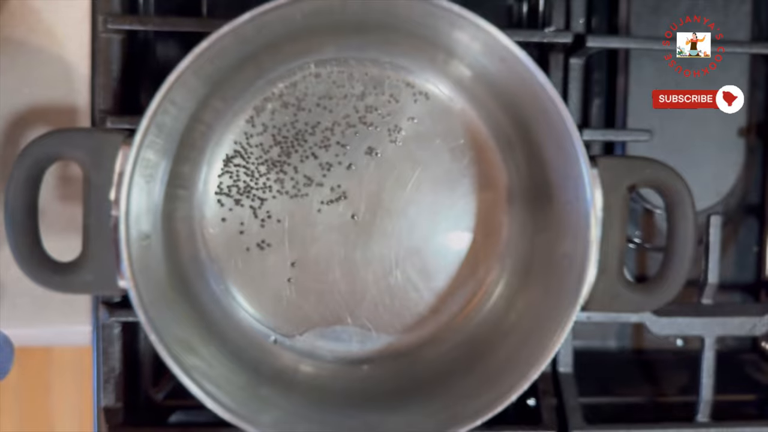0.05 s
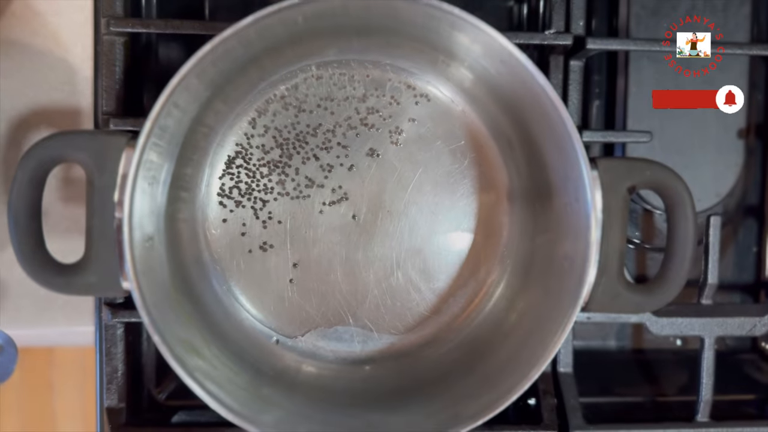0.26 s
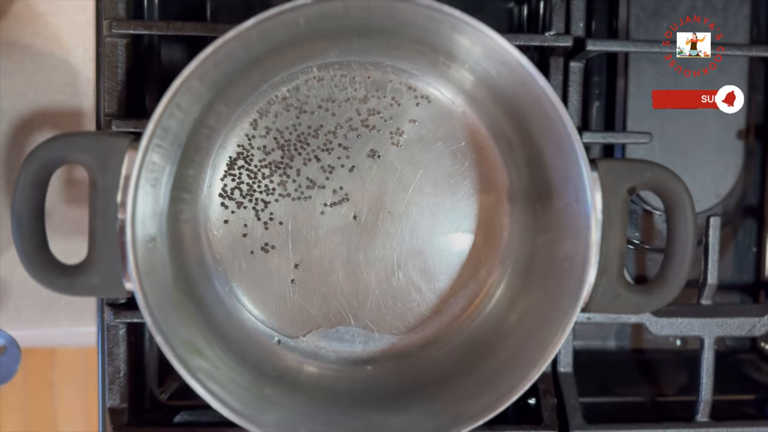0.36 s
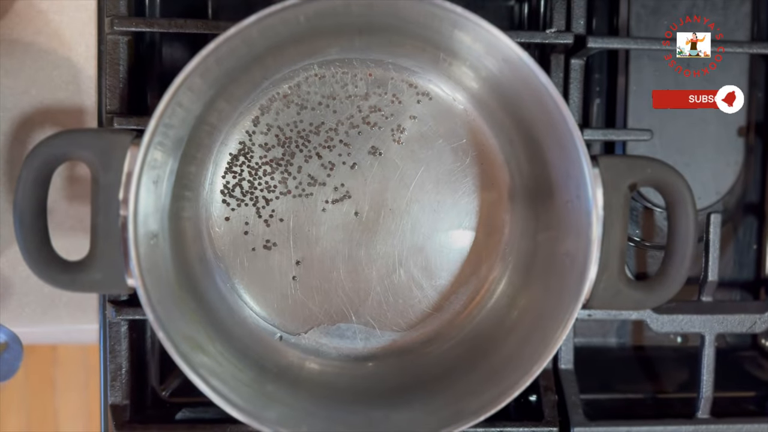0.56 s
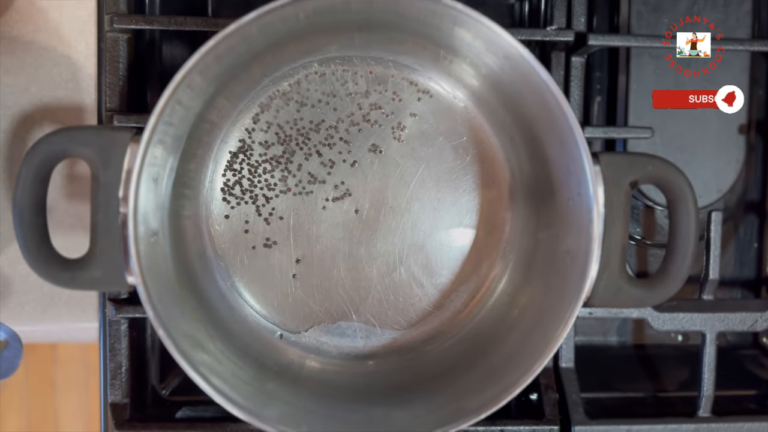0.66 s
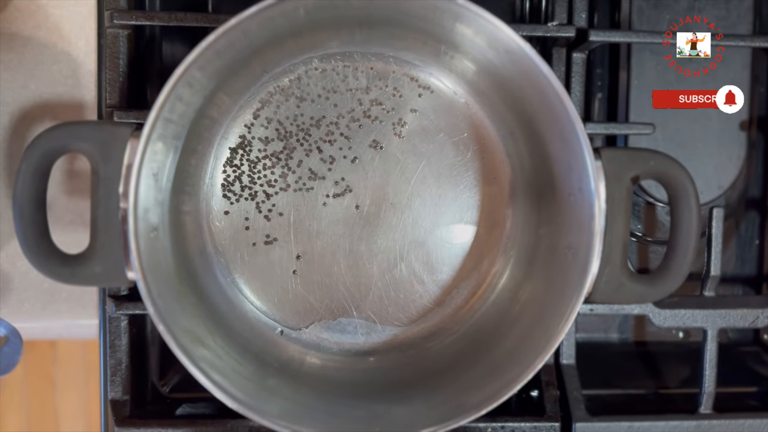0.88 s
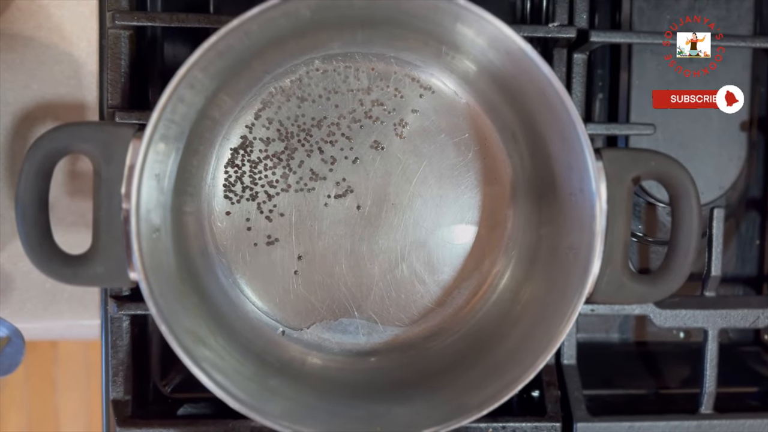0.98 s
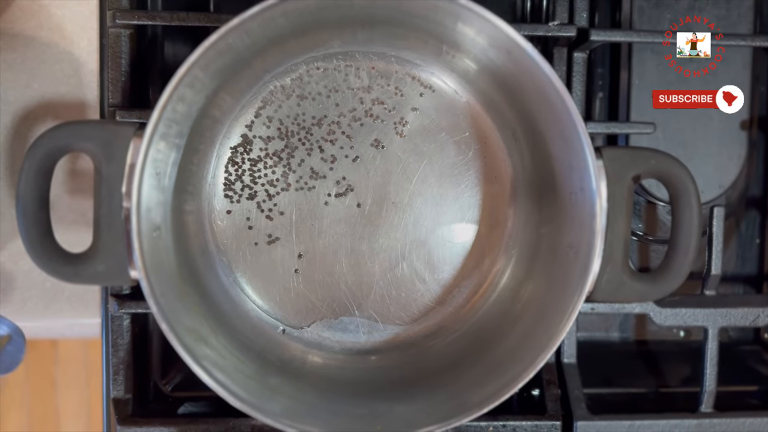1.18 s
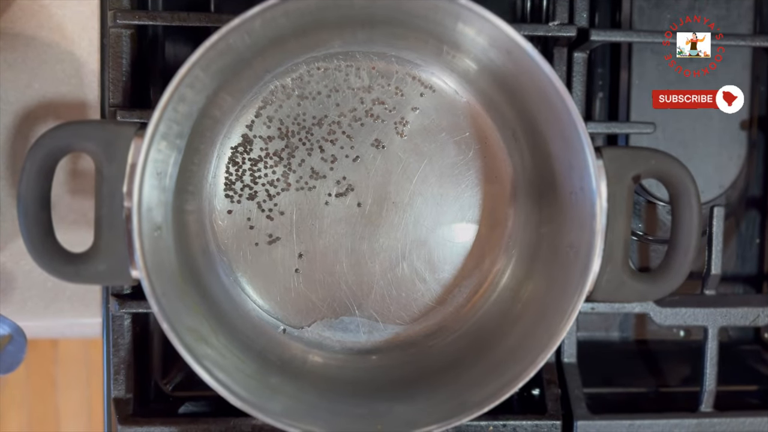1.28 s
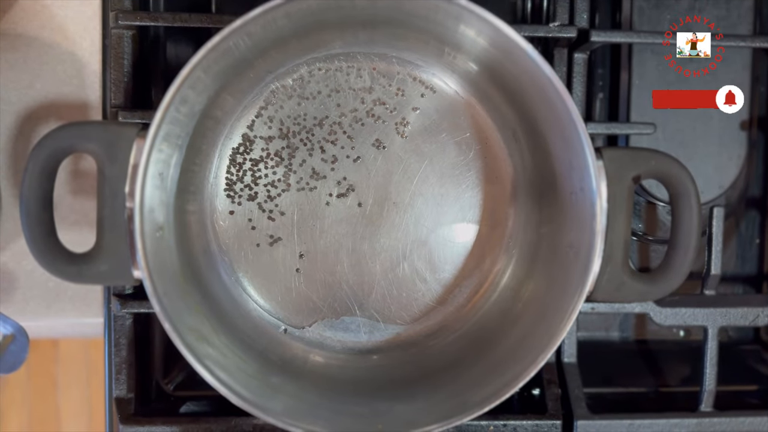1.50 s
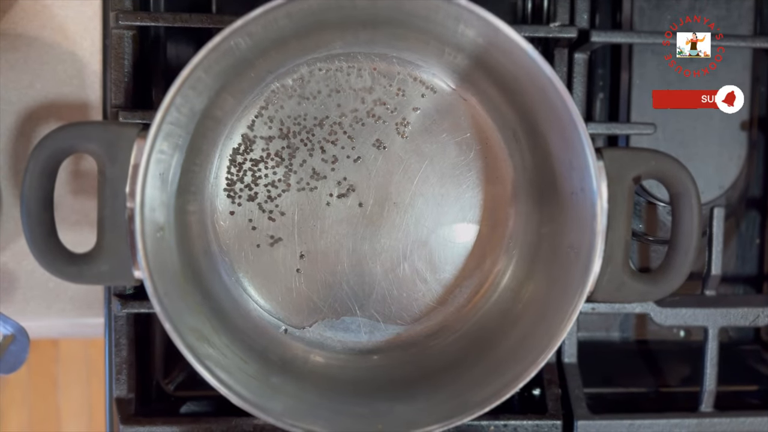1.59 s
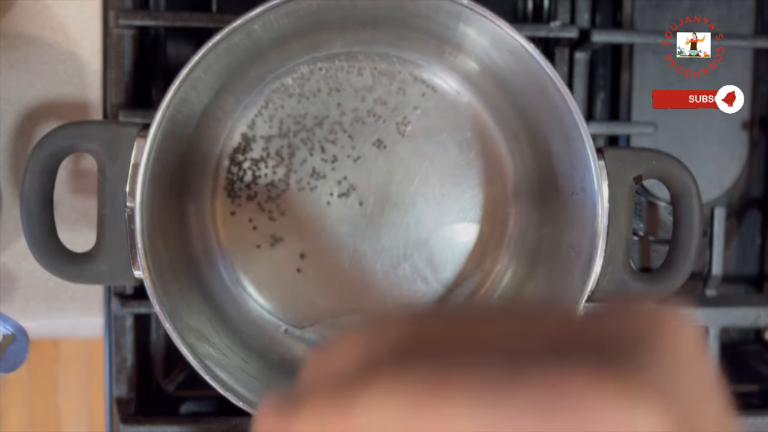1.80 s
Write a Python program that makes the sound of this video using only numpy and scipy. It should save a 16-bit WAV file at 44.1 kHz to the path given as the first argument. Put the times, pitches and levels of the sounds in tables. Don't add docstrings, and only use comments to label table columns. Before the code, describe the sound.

Seeds sizzle softly in hot oil while a small hollow jar knocks and scrapes on a counter

```python
import sys
import numpy as np
from scipy import signal
from scipy.fft import rfft, irfft, next_fast_len
from scipy.io import wavfile

SR = 44100
rng = np.random.default_rng(int(sys.argv[2]) if len(sys.argv) > 2 else 0)


def transcribe(u):
    v = np.clip(np.atleast_2d(u).T, -1, 1)
    q = np.round(v * 32767).astype(np.int16)
    wavfile.write(sys.argv[1], SR, q)


def level_to_linear(level):
    exponent = np.asarray(level, float) / 20
    return 10 ** exponent


N = 81585


def rms_one(x):
    return x / np.sqrt(np.mean(x ** 2) + 1e-20)


def in_time(rows):
    return np.interp(np.arange(N) / SR, *np.transpose(rows))


def at_hz(points, hz):
    points = np.array(points)
    return np.interp(np.log(hz + 1), np.log(points[:, 0]), points[:, 1])


def colour(x, db_at):
    size = next_fast_len(len(x) + 4096)
    cepstrum = irfft(np.log(level_to_linear(db_at(np.fft.rfftfreq(size, 1 / SR)))), size)
    cepstrum[1:size // 2] *= 2
    cepstrum[size // 2 + 1:] = 0
    return irfft(rfft(x, size) * np.exp(rfft(cepstrum)), size)[:len(x)]


def drift(rate):
    r = np.exp(-2 * np.pi * rate / SR)
    wander = signal.lfilter([1], [1, -2 * r, r * r], rng.standard_normal(N + SR))
    return rms_one(wander[SR:])


def ring(x, hz, t60):
    r = level_to_linear(-60 / (t60 * SR))
    w = 2 * np.pi * hz / SR
    return signal.lfilter([0, np.sin(w)], [1, -2 * r * np.cos(w), r * r], x + 1e-18)


def grains(per_s, spread_db):
    sizes = level_to_linear(spread_db * np.minimum(rng.exponential(1, N), 5)) * rng.choice([-1, 1], N)
    return rms_one(sizes * (rng.random(N) < per_s / SR))


def dying_noise(t60, size):
    x = rng.standard_normal(size) * level_to_linear(-60 * np.arange(size) / SR / t60)
    return x / np.sqrt(np.sum(x ** 2))


# pitch in Hz, level in dB, ring time t60 in seconds.
JAR_MODES = [(285, -9, .05), (400, -8, .05), (495, -5, .05), (620, -5, .06), (790, -5, .04), (845, -3, .06),
             (1030, 2, .045), (1110, 1, .07), (1260, -6, .03), (1400, -6, .03), (2350, -8, .03),
             (2970, -9, .03), (3280, -10, .03), (4230, -10, .05)]


def jar_body(x):
    modes = []
    for k, (hz, db, t60) in enumerate(JAR_MODES):
        modes.append(level_to_linear(db) * ring(x, hz, t60) * (-1) ** k)
    return sum(modes[:6]), sum(modes[6:])


# start in seconds, peak in dB, pitch of the hollow in Hz,
# crack in dB against the ring, thud in dB against the ring.
KNOCKS = [(.181,-40,3150,-4,-30), (.185,-50,1110,0,-30), (0.2003,-25.5,1234,0,-18), (0.2122,-30,3020,1,-35),
          (0.2136,-25,812,-12,-9), (.223,-57,790,-10,-26), (.261,-43.5,605,8.5,11), (.277,-39.5,2310,3,-20),
          (.315,-43.5,3800,6.5,-20), (0.377,-34.5,1235,6.5,-15), (0.4298,-15.5,945,-14,-8),
          (.433,-12,1007,-4,-4), (.4375,-13.5,1232,-9.5,-6), (.441,-17.5,812,-8,-4),
          (0.4484,-20.5,507,-5,8), (.454,-26.5,1385,-4,-10), (.461,-39,860,-8,0), (.476,-33.5,620,-2,-5),
          (0.507,-37,680,-6,-25), (0.542,-32.5,1100,2,-8), (.549,-30.5,1490,-14,-34),
          (.566,-31,1310,2.5,-20), (.573,-34,1204,2.5,-20), (0.578,-26.5,1132,-9,-8),
          (.7,-17,1025,-12,-18.5), (.708,-29.5,1023,-5,-42), (.729,-25,1077,-2.5,-43),
          (0.76,-31,1140,-4,-24), (0.786,-31,1160,2,-34), (.878,-36.5,490,-7,-33), (.908,-35.5,450,-21,6),
          (0.955,-44,2830,6,-20), (.9692,-29.5,900,-10,-13), (.9815,-37.5,606,-12,-3),
          (0.9842,-34.5,790,-9,1), (1.308,-42,2950,2,-16), (1.324,-40.5,410,7.5,-3)]
# frequency in Hz, level in dB per Hz.
SCRAPE_COLOUR = [(200, -6), (700, 0), (1500, 1), (3000, 3), (4300, 2), (6000, 1), (9300, -3), (15000, -3)]
CONTACT_S, HOLLOW_T60_S, CRACK_T60_S = 0.0026, 0.02, 0.016
HOLLOW_DB, BODY_DB, CRACK_DB = -1, -9, 8
THUD_HZ, THUD_T60_S, THUD_DB = 283, 0.019, -8.5
LOW_BODY_DB, LOW_BODY_FOLLOWS = 4.5, 0.52


def knocks():
    size = SR // 4
    t = np.arange(size) / SR
    out, cracks = np.zeros(N + size), np.zeros(N + size)
    contact = np.sin(np.pi * np.clip(t / CONTACT_S, 0, 1)) ** 2
    thud = level_to_linear(THUD_DB) * ring(contact / contact.sum(), THUD_HZ, THUD_T60_S)
    for s, db, hz, crack_db, thud_db in KNOCKS:
        i = int(s * SR)
        hollow = ring(contact * np.sin(2 * np.pi * hz * t), hz, HOLLOW_T60_S)
        hollow = level_to_linear(HOLLOW_DB) * hollow / np.abs(hollow).max()

        low, high = jar_body(contact * rng.standard_normal(size))
        body = high + level_to_linear(LOW_BODY_DB + LOW_BODY_FOLLOWS * thud_db) * low
        peakiness = rms_one(body[:SR // 100]).max()
        body = level_to_linear(BODY_DB) * peakiness * body / np.abs(body).max() / 2
        out[i:i + size] += level_to_linear(db) * (hollow + body + level_to_linear(thud_db) * thud)

        crack = np.minimum(t / CONTACT_S, 1) * rng.standard_normal(size) * level_to_linear(-60 * t / CRACK_T60_S)
        cracks[i:i + size] += level_to_linear(db + crack_db + CRACK_DB) * crack
    return out[:N] + colour(cracks[:N], lambda hz: at_hz(SCRAPE_COLOUR, hz))


# start, hardest moment and end in seconds, level in dB, low modes in dB.
SLIDES = [(0, -0, 0.3, -47.5, -1.5), (0.145, 0.197, 0.221, -38, -3), (0.222, 0.274, 0.43, -45.5, 0.5),
          (0.337, 0.378, 1, -46.5, 1), (0.413, 0.433, .5, -33, 7.5), (0.491, 0.526, 0.54, -36.5, -4.5),
          (0.523, 0.559, 0.65, -38.5, -3.5), (0.632, 0.707, 0.78, -36, -14),
          (0.676, 0.694, 0.76, -33.5, -10), (0.71, 0.739, 0.93, -39, -23), (0.87, .9, 0.94, -43, 0),
          (0.916, 0.943, 1.05, -42, 0), (1.038, 1.06, 1.38, -54.5, -0.5), (1.28, 1.322, 1.5, -52.5, -6)]
CONTACTS_PER_S, CONTACT_SPREAD_DB, JUDDER_DB = 3000, 2.5, 2.5
SMOOTH_RUB_DB, SCRAPE_HISS_DB = 1.5, 7


def slide():
    rub = grains(CONTACTS_PER_S, CONTACT_SPREAD_DB) + level_to_linear(SMOOTH_RUB_DB) * rng.standard_normal(N)
    push = rub * level_to_linear(JUDDER_DB * drift(42))
    low, high = jar_body(push)
    hiss = rms_one(colour(push, lambda hz: at_hz(SCRAPE_COLOUR, hz)))
    bright = rms_one(high) + level_to_linear(SCRAPE_HISS_DB) * hiss

    swells = np.array([level_to_linear(2 * db) * in_time([(start, 0), (hardest, 1), (end, 0)]) ** 2
                       for start, hardest, end, db, low_db in SLIDES])
    low_power = level_to_linear(2 * np.array(SLIDES)[:, 4] - 22) @ swells
    return np.sqrt(swells.sum(axis=0)) * rms_one(bright) + np.sqrt(low_power) * rms_one(low)


SPIT_T60_S, SPIT_DB = .011, 7


def spit_level(rows):
    t = np.arange(N) / SR
    return sum(level_to_linear(db + SPIT_DB - 60 * np.maximum(t - s, 0) / SPIT_T60_S) * (t >= s) for s, db in rows)


# frequency in Hz, level in dB per Hz.
SIZZLE_COLOUR = [(3000, -22), (5800, -12), (7200, -5), (9200, -9), (10400, -6), (11600, -8), (14800, 0),
                 (16000, -2)]
# time in seconds, level in dB.
VIGOUR = [(0, 3), (.3, 1.5), (.6, 5), (.9, 4.5), (1.2, 2.5), (1.4, 1.3), (1.85, 3)]
# start in seconds, peak in dB.
SMALL_SPITS = [
    (.3767, -34),
    (.9243, -42),
    (.9574, -40),
    (1.038, -36),
    (1.3844, -40),
    (1.422, -38),
    (1.531, -40),
    (1.7194, -40),
    (1.7826, -40),
]
SIZZLE_DB, BURSTS_PER_S, BURST_SPREAD_DB, CLUMP_DB, SMOOTH_HISS_DB = -46, 2500, -3, 3, 0


def sizzle():
    clumps = level_to_linear(CLUMP_DB * (drift(70) + .5 * drift(5)))
    bursts = grains(BURSTS_PER_S * clumps, BURST_SPREAD_DB)
    hiss = level_to_linear(SMOOTH_HISS_DB) * rng.standard_normal(N)
    frying = (bursts + hiss) * level_to_linear(SIZZLE_DB + in_time(VIGOUR))
    small = spit_level(SMALL_SPITS) * rng.standard_normal(N)
    return colour(frying + small, lambda hz: at_hz(SIZZLE_COLOUR, hz) + 4)


# start in seconds, peak in dB.
SPITS = [
    (.5415, -36),
    (.5445, -30),
    (.548, -30.5),
    (.551, -38),
    (.555, -33),
    (1.3091, -30.5),
    (1.3203, -27),
    (1.323, -38),
    (1.327, -38),
]


def spits():
    level = spit_level(SPITS)
    lift = [(3000, 8), (9000, 0)]

    def db_at(hz):
        return at_hz(SIZZLE_COLOUR, hz) + at_hz(lift, hz)
    return np.array([colour(level * rng.standard_normal(N), db_at) for side in range(2)])


# start in seconds, peak in dB, pitch in Hz, fade t60 in seconds.
BUMPS = [(0.199, -32, 61.6, 0.096), (0.25, -38.5, 50, 0.22), (.25, -46, 99, .1), (0.355, -45.5, 64, .12),
         (0.432, -35, 130, 0.079), (0.43, -38, 45, .12), (0.531, -48, 162, 0.094), (0.575, -42, 165, 0.089),
         (0.699, -40.5, 51.5, 0.12), (.77, -50, 54.6, .1), (.83, -49, 45, 0.087), (0.902, -48, 56, .2),
         (.98, -47, 190, 0.043), (1.04, -45.5, 45.4, .15), (1.181, -51, 55, 0.077), (1.269, -51, 65, .15),
         (1.335, -43.5, 56.5, 0.17), (1.61, -53.5, 131, .1), (1.664, -50, 120, 0.2),
         (1.75, -52, 59.7, 0.12)]
BUMP_RISE_S = 0.012


def bumps():
    s, db, hz, t60 = np.transpose(BUMPS)[:, :, None]
    t = np.maximum(np.arange(N) / SR - s, 0)
    swell = np.sin(np.pi / 2 * np.minimum(t / BUMP_RISE_S, 1)) ** 2
    fade = level_to_linear(db - 60 * np.maximum(t - BUMP_RISE_S, 0) / t60)
    return np.sum(fade * swell * np.sin(2 * np.pi * hz * t), axis=0)


# time in seconds, level in dB.
RUMBLE = [(0.0, -64), (0.19, -56), (0.39, -53.5), (0.56, -52), (0.89, -55.5), (1.118, -64), (1.85, -62.5)]


def rumble():
    band = signal.butter(2, [40, 170], "band", fs=SR, output="sos")
    low = signal.sosfilt(band, rng.standard_normal(N + SR))[SR:]
    lumps_db = 4 * drift(33)
    return level_to_linear(in_time(RUMBLE) - 6 + lumps_db) * rms_one(low)


# frequency in Hz, level in dB per Hz.
AIR_LOW = [(25, -25), (50, -0.5), (130, -17), (220, -17), (560, -7.5), (800, -18.5), (1200, -11.5),
           (2300, -18)]
# frequency in Hz, level in dB per Hz.
AIR_TOP = [(2300, 2), (3200, 10.5), (4000, 1), (6000, -10), (16000, -1.5)]
AIR_DB, BURNER_HZ, BURNER_WIDTH_HZ, BURNER_DB = -52, 1666, 17, 10


def air():
    def db_at(hz):
        burner = BURNER_DB / (1 + ((hz - BURNER_HZ) / BURNER_WIDTH_HZ) ** 2)
        return at_hz(AIR_LOW, hz) + at_hz(AIR_TOP, hz) - AIR_TOP[0][1] + burner
    return level_to_linear(AIR_DB) * rms_one(colour(rng.standard_normal(N), db_at))


# frequency in Hz, lead of the right port in radians.
PORT_LEAD = [(100, 0.05), (2300, .1), (3200, 1.2), (4200, 1.6), (4700, 3.0), (5250, 3.2), (5650, .15),
             (6150, .15), (6700, .9), (10000, 2.6), (10600, 3.1), (13050, 3.18), (13500, 3.7), (16000, 4.8)]
# frequency in Hz, likeness from 0 to 1.
PORT_ALIKE = [(50, .95), (350, .92), (600, .7), (800, .5), (1900, .93), (2600, .2), (4400, .4), (4800, .98),
              (5300, .98), (6150, .97), (6800, .85), (9600, .88), (10550, 1), (13100, 1), (13800, .88)]
PORT_SWAY, PORT_SWAY_PER_S = .025, 7


def ports(shared, own):
    size = next_fast_len(N + SR // 4)
    views = []
    for stretch in (1 - PORT_SWAY, 1 + PORT_SWAY):
        hz = stretch * np.fft.rfftfreq(size, 1 / SR)
        alike = np.clip(at_hz(PORT_ALIKE, hz), 0, 1)
        lead = np.interp(hz, *np.transpose(PORT_LEAD))
        turn = np.exp(.5j * lead * [[-1], [1]])
        together = np.sqrt(alike) * turn * rfft(shared, size)
        apart = np.sqrt(1 - alike) * rfft(own, size)
        views.append(irfft(together + apart, size)[:, :N])
    sway = np.clip(.5 + .6 * drift(PORT_SWAY_PER_S), 0, 1)
    return sway * views[0] + (1 - sway) * views[1]


SCATTER_T60_S, KITCHEN_T60_S, KITCHEN_DB = .03, .2, -11


def scene():
    jar = knocks() + slide()
    echo = np.r_[np.zeros(SR // 200), dying_noise(KITCHEN_T60_S, SR // 2)]
    tail = signal.fftconvolve(jar, echo)[:N]
    near = jar + level_to_linear(KITCHEN_DB) * tail + sizzle() + rumble() + bumps()
    own = []
    for side in range(2):
        scattered = signal.fftconvolve(near, dying_noise(SCATTER_T60_S, SR // 10))[:N]
        own.append(scattered + air())
    balance = level_to_linear(np.array([[.2], [-.2]]))
    return (ports(near + air(), own) + spits()) * balance


def band_limit(x):
    return signal.sosfilt(signal.butter(12, 15900, fs=SR, output="sos"), x)


def record(dry):
    top_cut = signal.ellip(10, .3, 45, 15850, fs=SR, output="sos")
    low_cut = signal.butter(2, 36, "high", fs=SR, output="sos")
    mix = signal.sosfilt(low_cut, signal.sosfiltfilt(top_cut, dry))
    return band_limit(mix)


dry = scene()
out = record(dry)
transcribe(out)
```